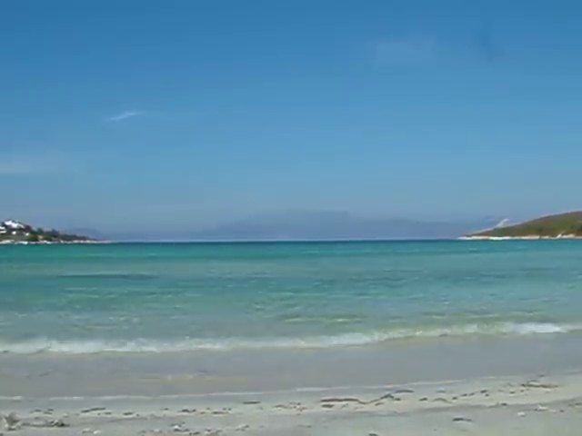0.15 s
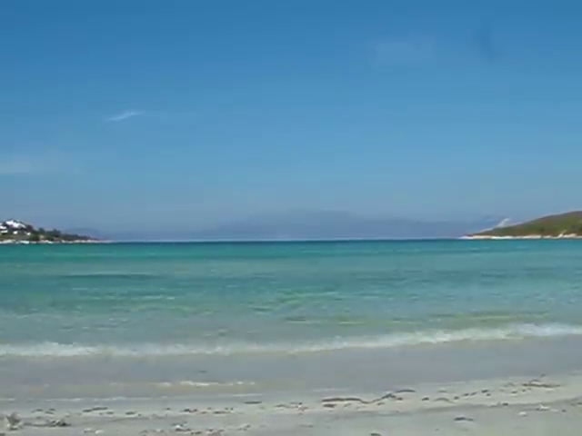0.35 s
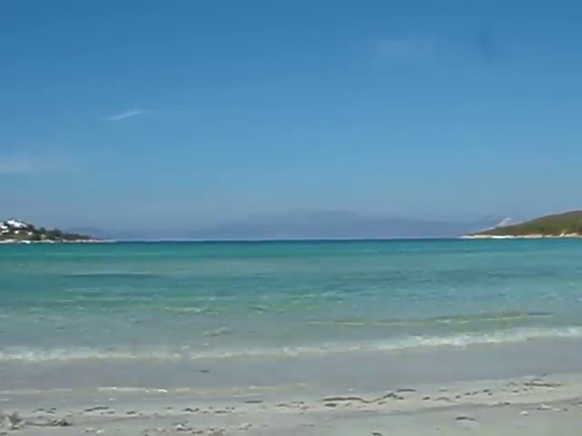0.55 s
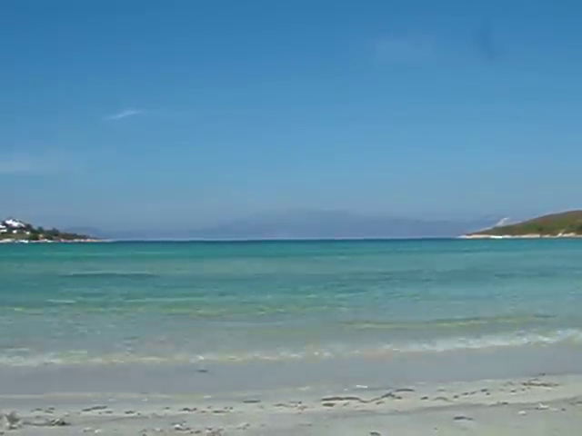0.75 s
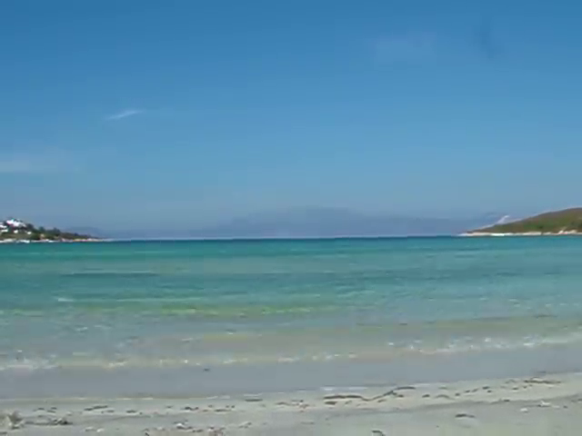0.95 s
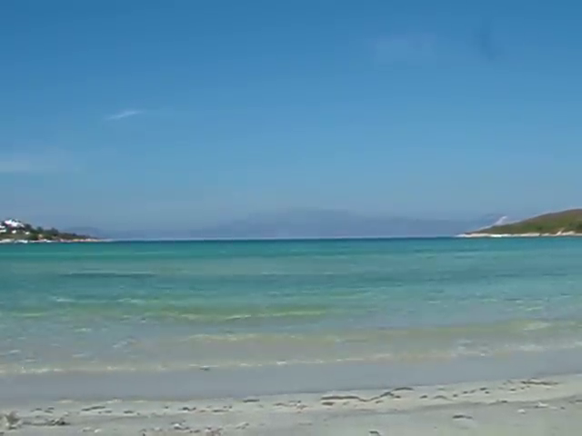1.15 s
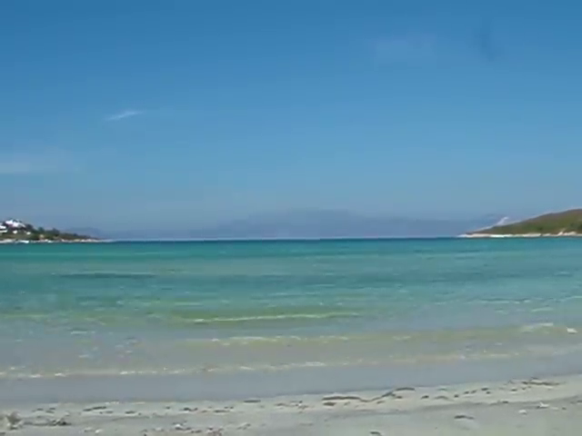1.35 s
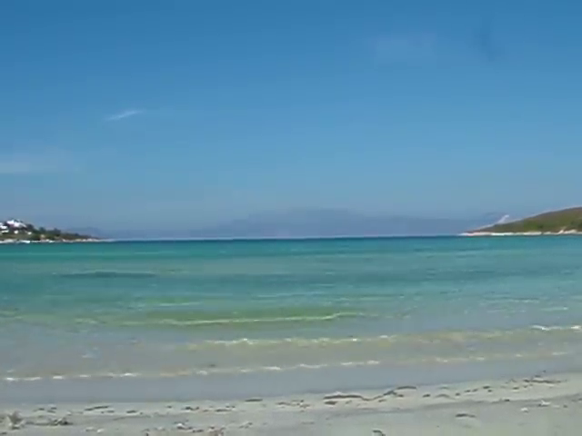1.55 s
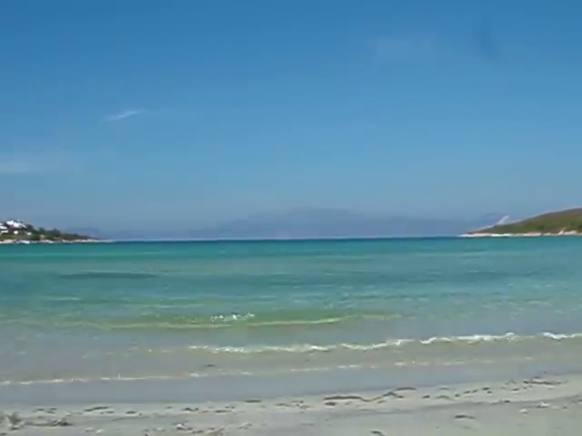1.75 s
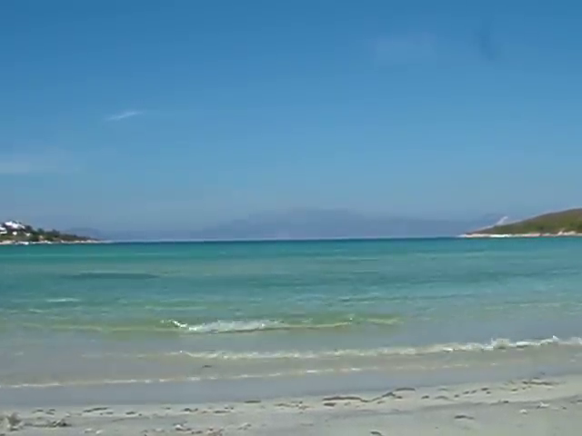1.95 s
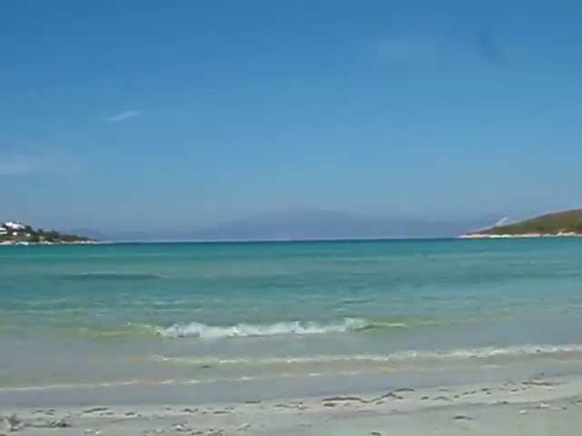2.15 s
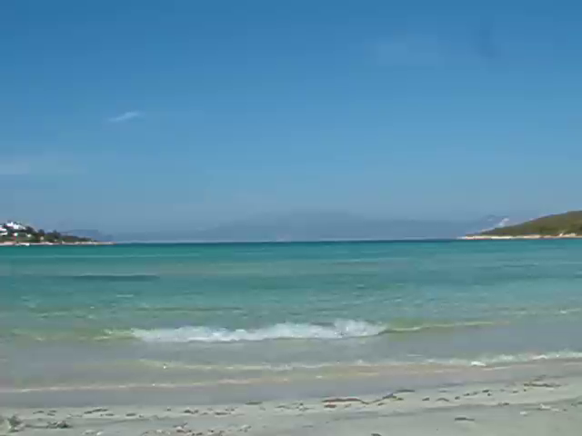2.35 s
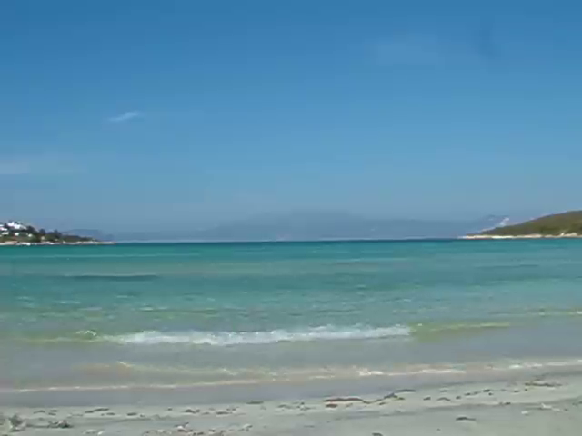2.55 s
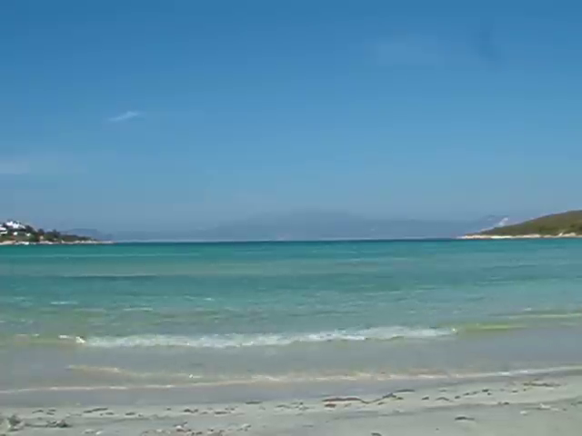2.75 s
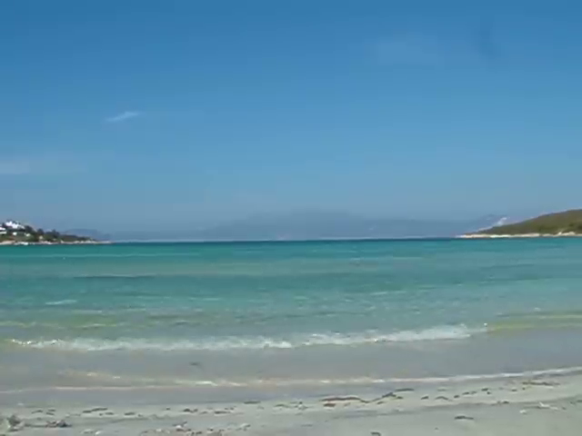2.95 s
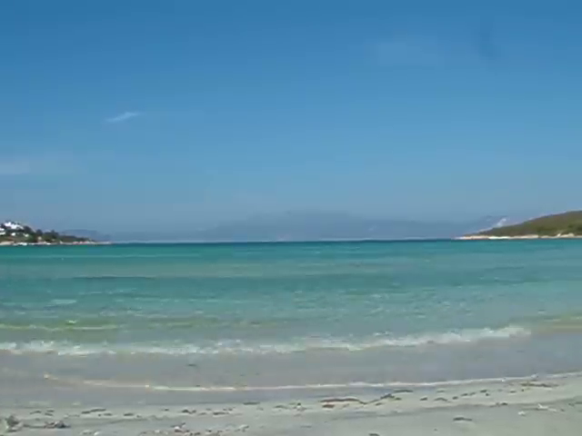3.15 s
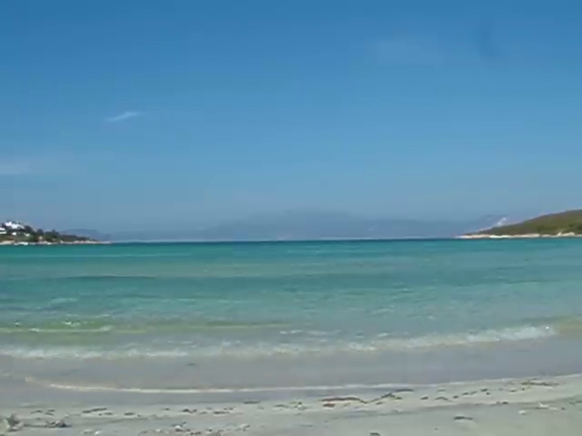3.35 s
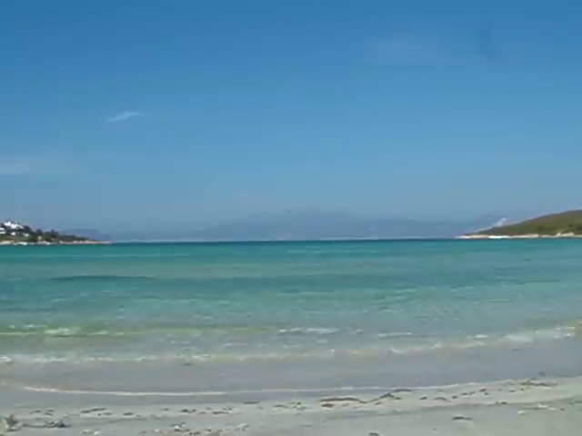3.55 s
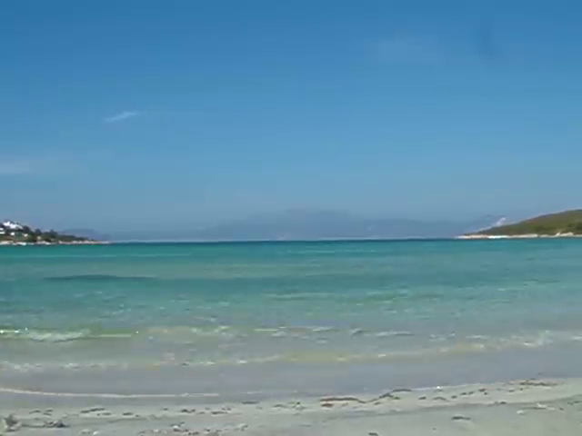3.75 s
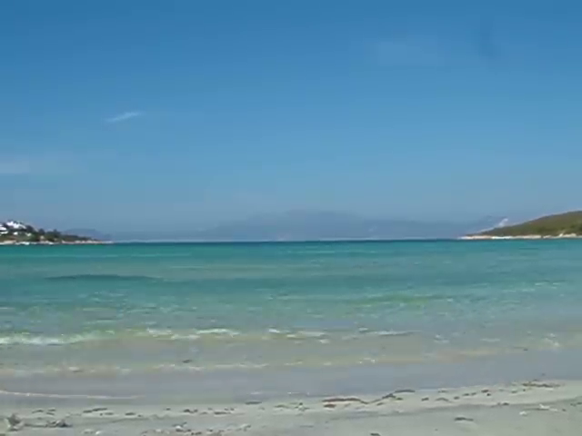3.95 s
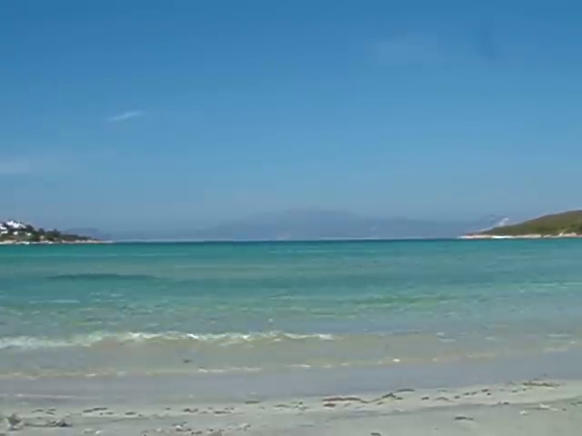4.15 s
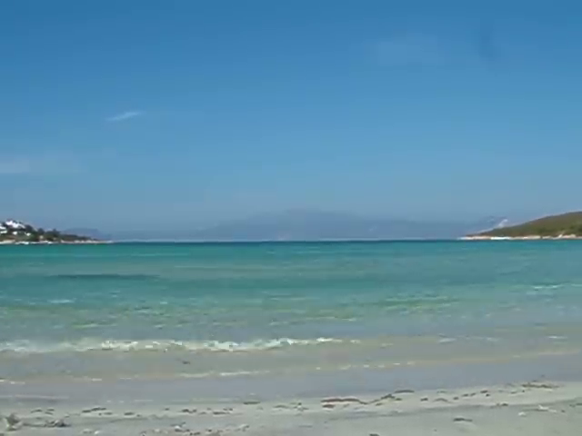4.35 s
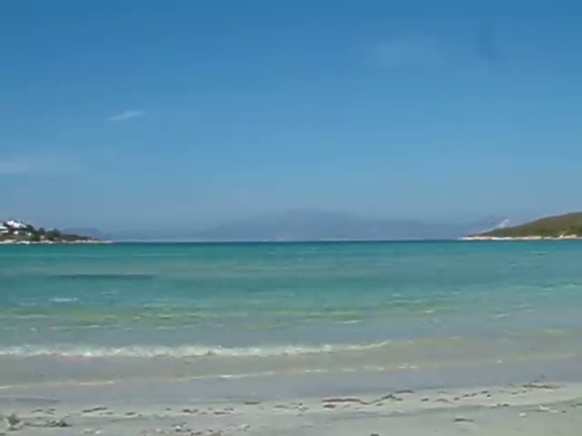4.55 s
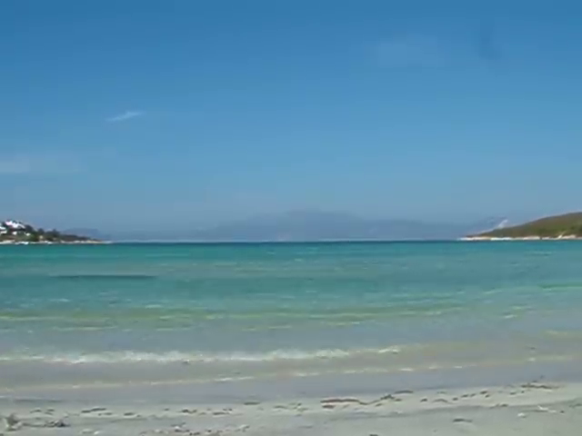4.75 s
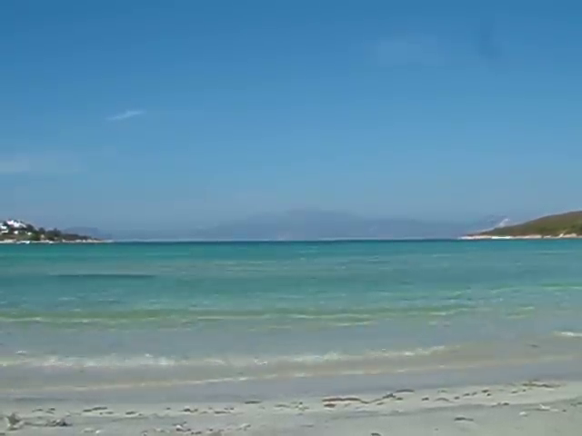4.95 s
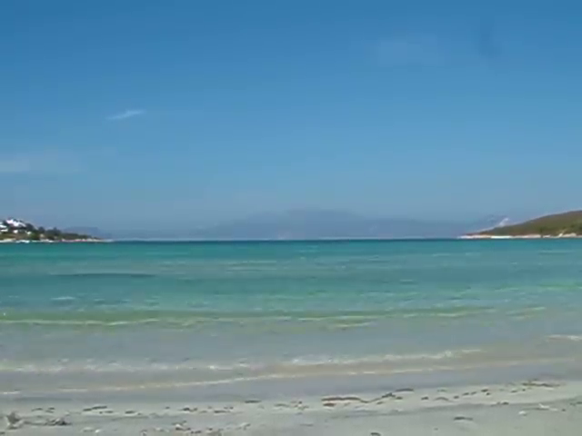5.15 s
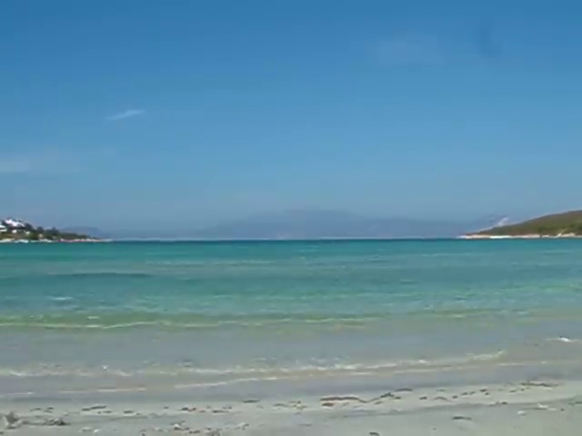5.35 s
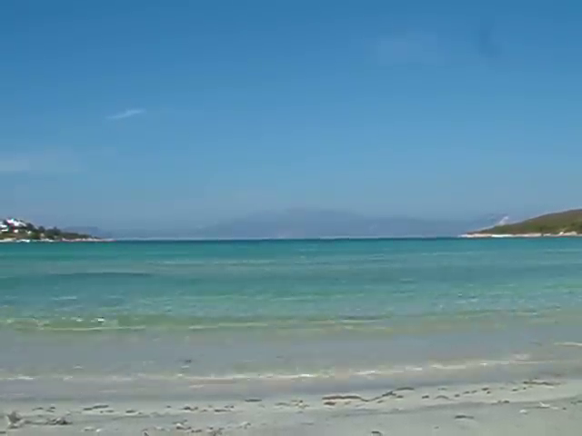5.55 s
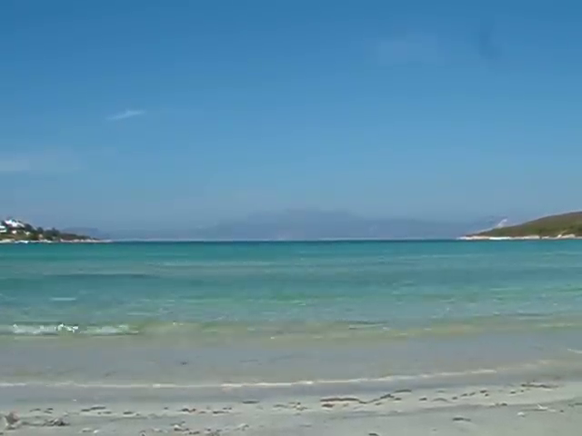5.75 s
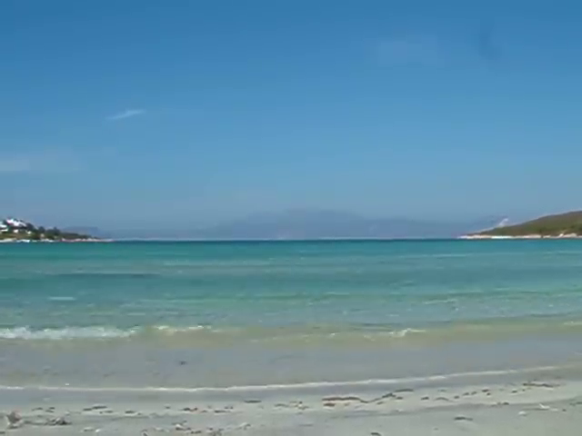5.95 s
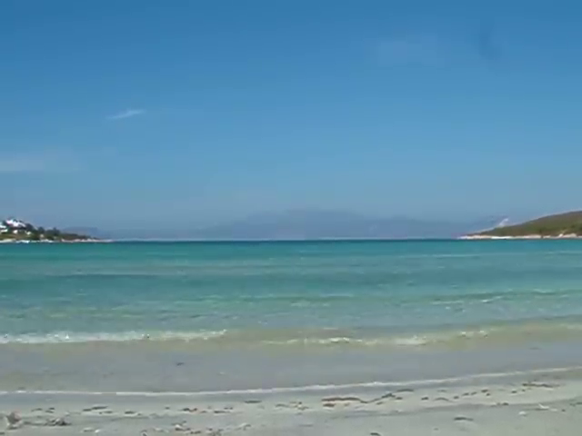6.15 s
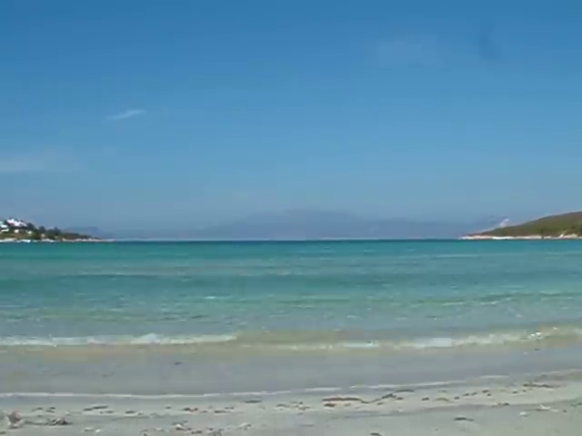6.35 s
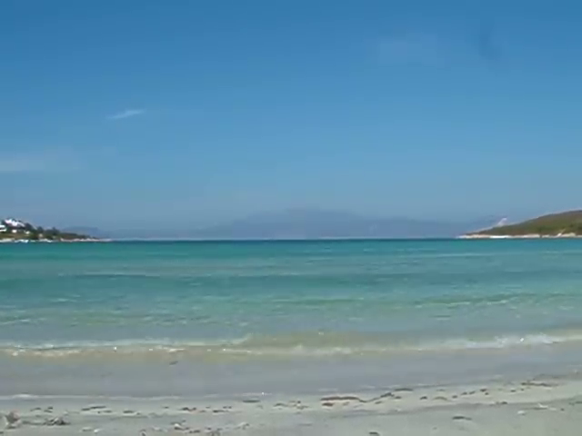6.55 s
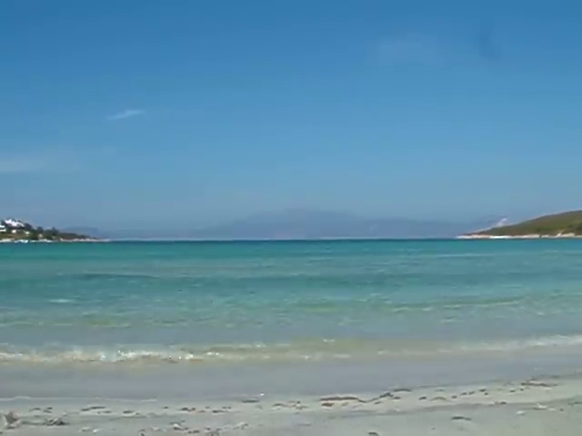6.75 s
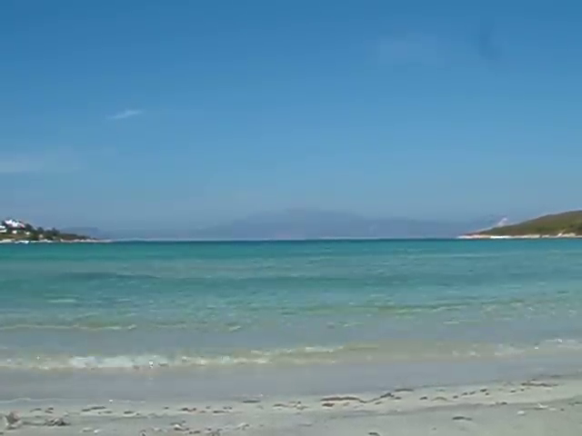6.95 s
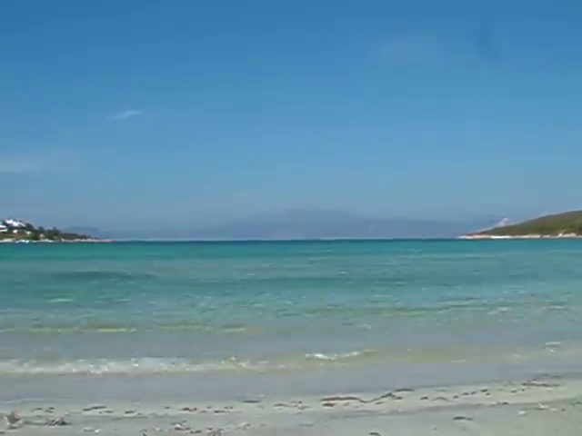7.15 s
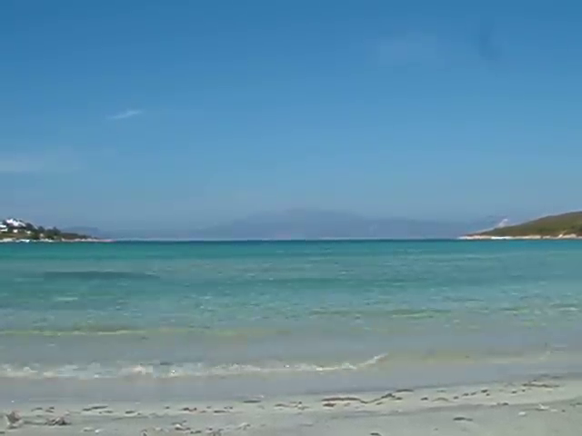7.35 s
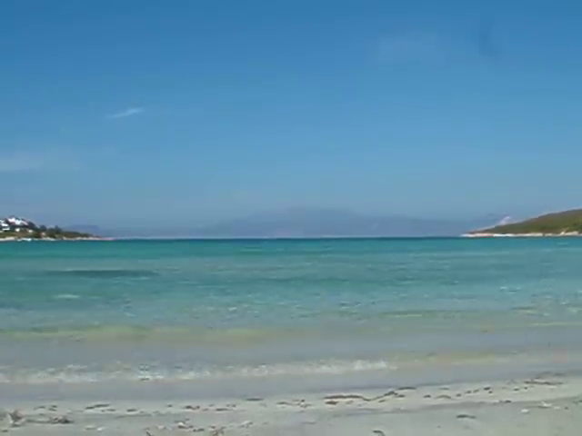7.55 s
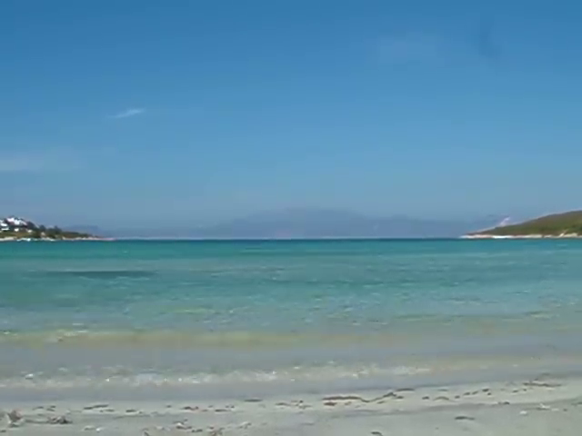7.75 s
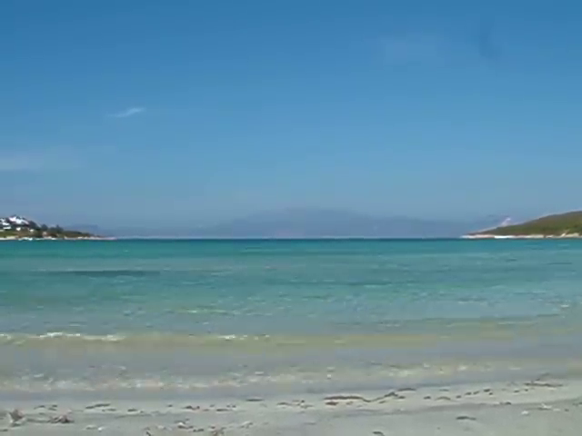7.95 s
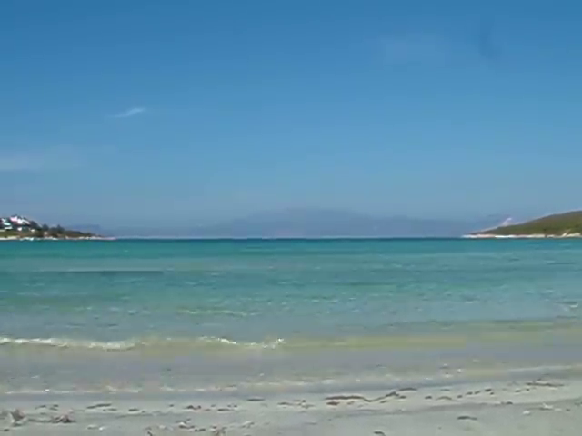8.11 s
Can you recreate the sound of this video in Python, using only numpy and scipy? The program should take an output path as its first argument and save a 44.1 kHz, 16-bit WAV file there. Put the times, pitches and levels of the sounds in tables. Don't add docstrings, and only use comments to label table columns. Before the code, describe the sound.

Small waves break and fizz up a sandy beach while gusty wind rumbles, flutters and thumps hard against a small camera's microphone.

```python
import sys
import numpy as np
from scipy import signal
from scipy.fft import rfft, irfft, next_fast_len
from scipy.io import wavfile
from scipy.ndimage import uniform_filter1d, map_coordinates

SR = 44100
rng = np.random.default_rng(int(sys.argv[2]) if len(sys.argv) > 2 else 0)


def pcm_store(signal):
    levels = np.round(np.clip(np.atleast_2d(signal), -1, 1) * 32767)
    wavfile.write(sys.argv[1], SR, levels.astype(np.int16).T)


def makeup_ratio(level_db):
    decades = np.asarray(level_db, float) / 20
    return 10 ** decades


N = 365148

# start of breaking in seconds, level of the plunge in dB,
# crest above the plunge in dB, run-up above the plunge in dB, time the level holds in seconds.
WAVES = [(-.51, -31, 1.6, 0.5, .43), (0.198, -38.5, 4, -1, .22), (0.731, -38.5, -.7, -2, .19),
         (1.714, -32, 2, -3, 0.46), (2.603, -33.5, 0, 0.1, 0.12), (3.448, -32.5, -1.6, -5, 0.51),
         (4.2, -35, -4, -1, .09), (5.05, -38, -3, -18, .7), (5.517, -31.5, -2.5, -1.5, .47),
         (6.518, -33, -4.5, -0.3, 0.12), (6.9, -35, -.5, .5, .27), (7.78, -33.5, -5, -6, .02),
         (8.101, -39.5, 5.5, 3.5, .3)]


def unit(x):
    return x / np.sqrt(np.mean(x ** 2) + 1e-20)


def slowly(shape):
    s = np.arange(0, N / SR + .01, .005)
    return np.interp(np.arange(N) / SR, s, shape(s))


def wobble(rate):
    points = rng.standard_normal(int(N * rate / SR) + 4)
    return map_coordinates(points, [np.arange(N) * rate / SR])


def coloured(x, *spectra):
    size = next_fast_len(N + 8192)
    log_hz = np.log(np.fft.rfftfreq(size, 1 / SR) + 1)
    db = 0
    for spectrum in spectra:
        hz, level = np.transpose(spectrum)
        db = db + np.interp(log_hz, np.log(hz + 1), level)
    return unit(irfft(rfft(x, size) * makeup_ratio(db), size)[:N])


def rush(patchy_db):
    z = signal.stft(rng.standard_normal(N), nperseg=512)[2]
    patches = uniform_filter1d(rng.standard_normal(z.shape), 7, axis=0)
    patches = uniform_filter1d(patches, 9, axis=1)
    return unit(signal.istft(z * makeup_ratio(patchy_db * unit(patches)), nperseg=512)[1][:N])


def rings(s, hz, cycles, size):
    k = np.arange(400)
    turns = k * hz[:, None] / SR
    swing = np.sin(2 * np.pi * turns * (1 + .12 * turns / cycles))
    wave = swing * np.exp(-3 * turns / cycles) * (1 - np.exp(-turns / 0.4))
    at = (s * SR).astype(int)[:, None] + k
    return np.bincount(at.ravel(), (size[:, None] * wave).ravel(), N + 400)[:N]


def bubbles(hz, cycles, spread_db, count):
    start = rng.random(count) * N / SR
    pitch, size = rng.standard_normal((count, 2)).T
    return unit(rings(start, np.minimum(hz * np.exp(0.259 * pitch), SR / 4), cycles, makeup_ratio(spread_db * size)))


def breaking(levels_db, lag, rise, fade_db, far_db):
    start, *_, holds = np.transpose(WAVES)[..., None]

    def level(s):
        age = s - start - lag
        fade = fade_db * np.maximum(age - rise - holds, 0)
        each = np.clip(age / rise, 0, 1) * makeup_ratio(levels_db[:, None] - fade)
        return 10 * np.log10(makeup_ratio(far_db) ** 2 + np.sum(each ** 2, axis=0))
    return slowly(level)


def water(share, db, grains, grain_db, patchy_db, churn):
    # pitch in Hz, level in dB per Hz.
    sea = [(240, -21), (400, -3.5), (870, -4.5), (1040, -7.5), (1430, -4), (1870, -12), (2340, -10),
           (3500, -8), (5360, -11), (6510, -14.5), (7410, -11.5), (8300, -5.5), (9250, -14.5)]
    return makeup_ratio(db + churn) * coloured(rush(patchy_db) + makeup_ratio(grain_db) * grains, sea, share)


def roar(plunge_db, churn):
    # pitch in Hz, share of the sea's sound in dB.
    roar_share = [(150, -30), (350, -1.5), (1600, -1), (2400, -2.5), (4000, -29)]
    db = breaking(plunge_db, lag=-.07, rise=.71, fade_db=11.2, far_db=-39)
    return water(roar_share, db + 1.5, bubbles(1010, 9.3, 4.8, count=3000), -17.5, 0.16, 0.051 * churn)


def wash(run_up_db, churn):
    # pitch in Hz, share of the sea's sound in dB.
    wash_share = [(1000, -42), (1700, -2.5), (2300, -1), (4000, -0.5), (5200, -3), (7000, -40.5)]
    db = breaking(run_up_db, lag=-.26, rise=.7, fade_db=9.8, far_db=-41.4)
    grains = bubbles(3100, 4.3, 3.6, count=5000)
    return water(wash_share, db + 1.63, grains, -13.0, 0.53, .5 * churn + 0.11 * wobble(30))


def spray(crest_db, churn):
    # pitch in Hz, share of the sea's sound in dB.
    spray_share = [(3000, -41.5), (4300, -8), (5200, -3), (6600, -2), (7400, -10.5), (8200, -21.5)]
    db = breaking(crest_db, lag=-.01, rise=.34, fade_db=14.4, far_db=-41.4)
    grains = bubbles(6460, 4.9, 3.3, count=5000)
    return water(spray_share, db + 0.37, grains, -10, 0.96, 0.089 * churn + 0.15 * wobble(23))


def foam(crest_db, churn):
    # pitch in Hz, share of the sea's sound in dB.
    foam_share = [(5500, -64.5), (6900, -14.5), (7700, 4.5), (9200, 14.5)]
    usual_crest_db, usual_froth_db, froth_grows = -32, -42.5, 2
    froth_db = usual_froth_db + froth_grows * (crest_db - usual_crest_db)
    db = breaking(froth_db, lag=-.16, rise=.6, fade_db=23, far_db=-62)
    grains = bubbles(8000, 5, 4.6, count=2500)
    return water(foam_share, db - .3, grains, 2, 2.6, .7 * churn + 2.2 * wobble(18))


def off_sand(x, dips, width):
    hz, t, z = signal.stft(x, SR, nperseg=512)
    for s, start_hz, climb, lasts, depth_db in dips:
        age = np.clip(t - s, 0, lasts)
        away = np.log((hz[:, None] + 1) / (start_hz + climb * age)) / width
        swell = np.sqrt(np.abs(np.sin(np.pi * age / lasts)))
        z = z * makeup_ratio(depth_db * swell * np.exp(-away ** 2))
    return signal.istft(z, SR, nperseg=512)[1][:N]


def surf():
    # start in seconds, first pitch of the dip in Hz,
    # climb in Hz per second, duration in seconds, depth in dB.
    fronts = [
        (-0.44, 3010.61, 3733.69, 2.4, -7.5),
        (1.123, 2582.7, 1622.51, 2.9, -4),
        (5.29, 2064.38, 2640, 1.2, -5.5),
    ]
    lull = [
        (4.95, 900, 0.015, 1.15, -4),
    ]
    _, plunge_db, crest, run_up, _ = np.transpose(WAVES)
    crest_db = plunge_db + crest
    churn = wobble(12)
    low = roar(plunge_db, churn)
    high = wash(plunge_db + run_up, churn) + spray(crest_db, churn) + foam(crest_db, churn)
    return off_sand(low, lull, width=0.15) + off_sand(high, fronts, width=0.27)


def snaps():
    # start in seconds, peak in dB.
    foam_snaps = [(0.0164, -25.5), (0.1506, -27), (0.2274, -24.5), (1.8512, -32), (2.1874, -30),
                  (2.2243, -26), (2.3072, -22), (2.3311, -27.5), (2.4319, -23), (2.4713, -25),
                  (2.7357, -33), (3.2271, -20), (3.4166, -32), (3.4346, -29.5), (3.8596, -20),
                  (3.9235, -30), (3.9444, -27), (4.0243, -23), (4.0941, -28), (4.352, -22), (5.3747, -37),
                  (5.8296, -33.5), (5.9668, -33), (6.1978, -26), (6.349, -30), (7.1551, -24), (7.4984, -32),
                  (7.6081, -25), (8.1329, -27), (8.2018, -24)]
    s, db = np.transpose(foam_snaps)
    return rings(s, np.full(len(s), 7500.), 18, makeup_ratio(db - 0.5))


def wind():
    # time in seconds, strength in dB, eddy pitch in Hz, raggedness in dB.
    wind_course = [(0, -29, 121.6, 4.5), (.33, -28, 120.1, 3.5), (.52, -23.5, 112.6, 2.5),
                   (.76, -24.5, 104.7, -1.5), (.9, -19.5, 103, -2.5), (1.226, -20, 111.3, -3),
                   (1.236, -31.5, 113.9, -4.5), (1.72, -36, 118.3, -2.5), (2.1, -29, 113.7, 0),
                   (2.85, -28.5, 120, 0), (3.55, -20.5, 136, 1.5), (4.2, -22, 124.7, 2),
                   (4.65, -20.5, 122.2, -0.5), (5.5, -23, 118.8, -1.5), (6.15, -24.5, 133.7, 2),
                   (6.45, -21, 138, 2), (7.85, -20, 126.5, -1.5), (8.28, -28.5, 118, -6.5)]
    # centre in seconds, change in dB.
    surges = [(.32, -2.5), (.7, -3.5), (.87, 2.5), (1.07, 2), (1.35, 6), (1.6, -5), (1.86, 5), (2.06, 1),
              (2.2, -6.5), (2.3, 0.5), (2.5, 4.5), (2.72, -2), (3.08, 3.5), (3.33, 1.5), (3.55, 1.5),
              (3.75, -0.5), (4.15, -2.5), (4.36, 4.5), (4.52, 2), (5.35, 3), (5.44, -1.5), (5.68, -3.5),
              (5.81, 7.5), (6.01, 2.5), (6.18, -5), (6.4, 6.5), (6.69, -5), (7.25, 5), (7.54, -6),
              (7.8, 1.5)]
    # pitch in Hz, level in dB per Hz.
    buffet_spectrum = [(12, -56), (20, -22), (52, -3.5), (102, 4), (157, 2.5), (231, -12), (300, -13),
                       (390, -17.5), (660, -120)]
    flutter_spectrum = [(120, -45.5), (200, -1.5), (260, -2.5), (400, -10), (700, -13), (1400, -42.5)]
    surge_s = 0.035
    usual_wind_db, usual_flutter_db, flutter_grows = -23.5, -30.5, 0.68

    s, *columns = np.transpose(wind_course)
    strength_db, eddy_hz, ragged_db = [np.interp(np.arange(N) / SR, s, c) for c in columns]
    surge_db = slowly(lambda t: sum(db * np.exp(-((t - s) / surge_s) ** 2) for s, db in surges))
    buffet_db = strength_db + surge_db
    flutter_db = usual_flutter_db + ragged_db + flutter_grows * (buffet_db - usual_wind_db) - buffet_db

    speed = (eddy_hz / 124) ** 1.5
    passed = np.cumsum(speed / speed.mean())
    eddies = np.interp(passed, np.arange(N), coloured(rng.standard_normal(N), buffet_spectrum))
    power = uniform_filter1d(uniform_filter1d(eddies ** 2, size=2500), size=2500)
    swell = np.sqrt(np.abs(power))
    lumps = wobble(14)
    buffet = unit(makeup_ratio(1.12 * lumps) * eddies / swell ** 0.43)

    skew = coloured(buffet * np.abs(buffet) + 0.59 * buffet ** 2, flutter_spectrum)
    gust_gain = makeup_ratio(0.87 * lumps + 2.4 * wobble(40))
    gusty = unit(gust_gain * coloured(rng.standard_normal(N), flutter_spectrum))
    flutter = makeup_ratio(flutter_db - 2.0) * unit(0.29 * skew + gusty)

    shove = puffs()
    held = 1 / (1 + 9 * uniform_filter1d(np.abs(shove), size=260))
    return shove + held * makeup_ratio(buffet_db) * (buffet + flutter)


def puffs():
    # centre in seconds, peak in dB, swing in Hz, length in seconds.
    single_puffs = [(1.2215, -10, 200, .012), (1.2272, -2.4, 200, .004), (2.8215, -13, 380, .007),
                    (2.8255, -8, 120, .016), (2.8332, -7.5, 390, .01), (.2045, -14, 450, .004),
                    (.213, -15, 250, .006), (2.628, -15, 250, .006), (2.6335, -12, 450, .004),
                    (4.452, -15, 250, .008), (5.812, -16, 220, .008), (6.2265, -9, 260, .007),
                    (6.234, -6, 450, .005), (6.3825, -9, 200, .012), (6.4, -9, 170, .014)]
    # start in seconds, peak in dB, swing in Hz.
    gusts = [(0.202, -12.5, 134), (0.562, -9, 121), (0.637, -19, 113), (0.728, -14, 83.4),
             (0.858, -21, 105), (1.384, -16.5, 105), (1.702, -35, 131), (2.045, -14, 125), (2.24, -23, 109),
             (2.331, -28, 143), (2.701, -28, 140), (2.813, -9, 167), (3.015, -20, 143), (3.314, -13, 94),
             (4.194, -10, 137), (4.325, -4.5, 123), (4.51, -8, 105), (5.451, -22, 145), (5.693, -20, 117),
             (5.877, -7, 106), (6.069, -22, 120), (6.211, -10, 122), (6.307, -7, 161), (6.606, -16, 190),
             (6.767, -6, 169), (7.174, -3, 126)]
    gust_s = 0.034
    rolling = [(s + gust_s / 2, db - 6.0, hz, gust_s) for s, db, hz in gusts]
    out = np.zeros(N)
    for s, db, hz, length in single_puffs + rolling:
        half = round(length * SR / 2)
        t = np.arange(-half, half)
        swing = np.cos(np.pi * t / SR / length) ** 2 * np.cos(2 * np.pi * hz * t / SR)
        out[round(s * SR) + t] -= makeup_ratio(db) * swing
    return out


def pops():
    # start in seconds, peak in dB, pitch in Hz.
    big_bubbles = [(0.226, -17, 6400), (0.6015, -23, 5300), (0.6654, -17, 5190), (1.034, -14, 5000),
                   (1.362, -15, 5000), (1.4431, -34, 4700), (1.718, -28, 4510), (1.7867, -25, 4800),
                   (1.8512, -13, 5870), (3.2497, -34, 5070), (3.5124, -14, 4610), (4.0947, -16.5, 5960),
                   (4.4697, -28, 5260), (5.3278, -13, 4770), (5.3754, -27, 5240), (5.436, -21, 6100),
                   (6.283, -28, 6100), (6.6827, -27, 5330), (6.788, -24, 4540), (7.027, -15, 5080),
                   (7.155, -21, 4500), (7.8403, -18.5, 4830), (7.9892, -30, 5360)]
    s, db, hz = np.transpose(big_bubbles)
    return rings(s, hz, 13.0, makeup_ratio(db - 2.5))


def scene():
    return np.tile(surf() + snaps() + wind() + pops(), (2, 1))


def whine():
    # pitch in Hz, level in dB rms.
    tones = [
        (7124, -55.5),
    ]
    turn = 2 * np.pi * np.arange(N) / SR
    return sum(makeup_ratio(db + 1) * np.sin(hz * turn + .8 * wobble(8)) for hz, db in tones)


def gain_control():
    # time in seconds, change in dB.
    cuts = [
        (1.229, -5),
        (2.837, -3),
    ]
    recover_db_per_s = 5
    t = np.arange(N) / SR
    return makeup_ratio(sum(np.where(t > s, np.minimum(db + recover_db_per_s * (t - s), 0), 0) for s, db in cuts))


def mirrored(spectrum):
    fold_hz = 8000
    fold = round(fold_hz * N / SR)
    away = np.arange(1, round(1300 * N / SR))
    khz = away * SR / N / 1000
    image = np.conj(spectrum[:, fold - away]) * np.exp(-.61j)
    out = spectrum.copy()
    out[:, fold + away] = image * makeup_ratio(-.6 - 29 * khz - 9 * khz ** 3)
    return out


def band_limit(x):
    return signal.sosfilt(signal.butter(12, 9170, fs=SR, output="sos"), x)


def record(dry):
    heard = dry * gain_control() + whine()
    over_khz = np.maximum(np.fft.rfftfreq(N, 1 / SR) - 7600, 0) / 1000
    dulled = rfft(heard) * makeup_ratio(-14 * over_khz ** 2)
    sampled = irfft(mirrored(dulled), N)
    return band_limit(np.clip(sampled, -.707, .707))


dry = scene()
out = record(dry)
pcm_store(out)
```